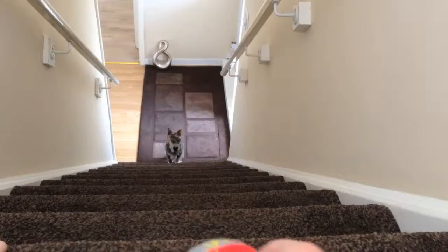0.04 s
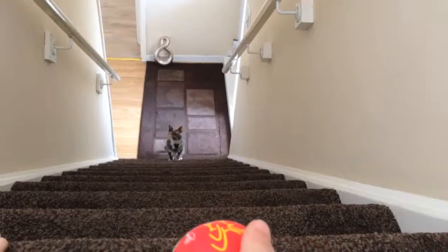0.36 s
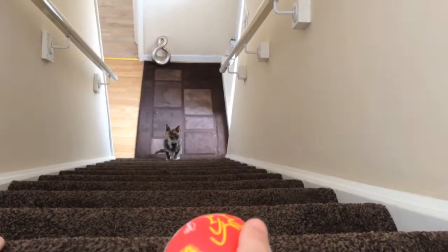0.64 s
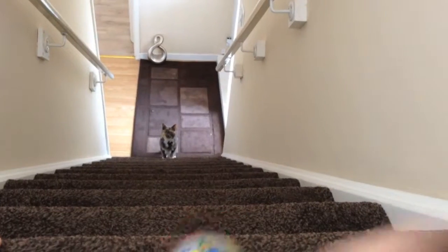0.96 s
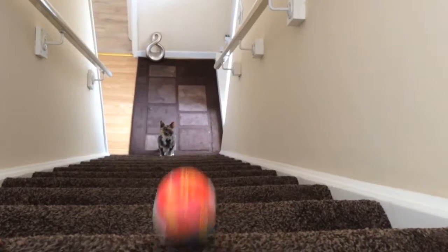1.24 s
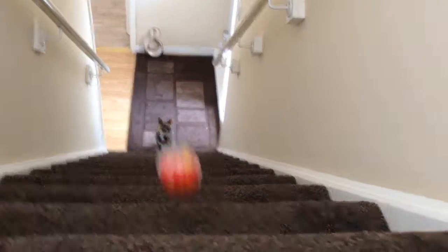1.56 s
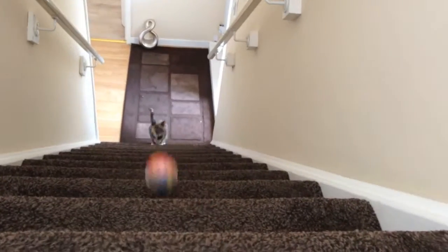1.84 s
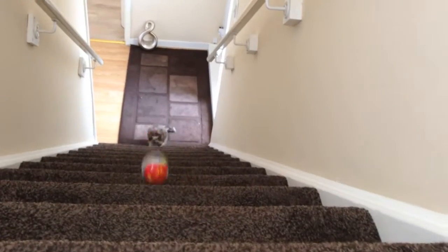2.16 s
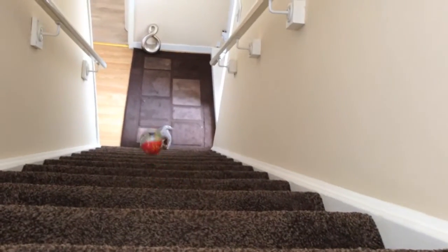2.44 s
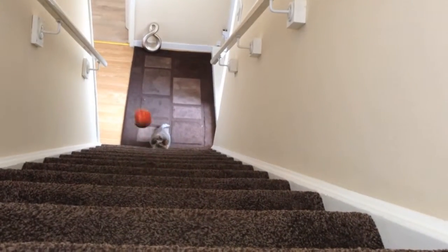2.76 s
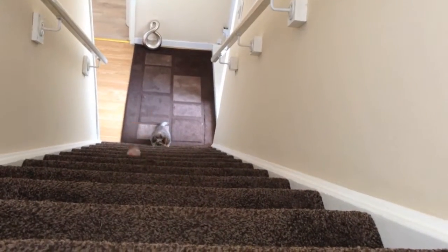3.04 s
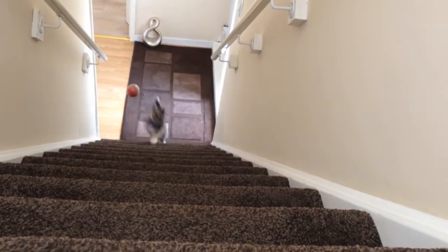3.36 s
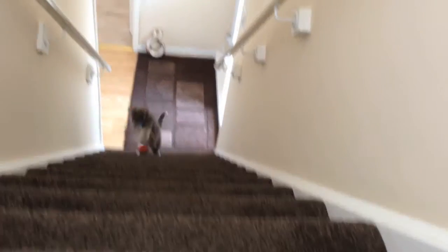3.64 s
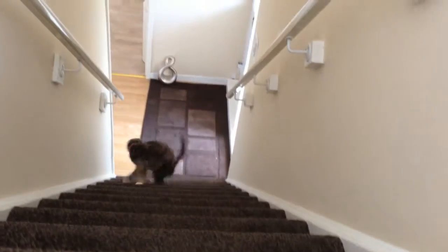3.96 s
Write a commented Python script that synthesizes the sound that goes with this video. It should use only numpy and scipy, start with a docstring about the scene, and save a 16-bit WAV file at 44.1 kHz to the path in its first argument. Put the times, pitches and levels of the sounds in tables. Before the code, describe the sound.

A ball bounces down carpeted wooden stairs, starting after a second of quiet indoor hiss. Six dull, low thuds come between about 1.1 and 3.1 seconds, each with a short boom in the stairwell. At about 3.6 seconds the ball smacks onto a hard floor. From around 3.3 seconds to 4, a small dog's paws thump softly and scuff, and its metal collar tag jingles faintly.

```python
"""A soft ball bounces down a carpeted wooden staircase and lands with a smack on the hard floor below.
Each bounce is a low push of the tread, a dull slap and the boom of the stairwell.
A small dog starts after it: its metal collar tag jingles, its paws thump and scuff.
A quiet hiss lies under all."""
import sys
import numpy as np
from scipy import signal
from scipy.fft import rfft, irfft
from scipy.io import wavfile
from scipy.ndimage import uniform_filter1d

SR = 44100
rng = np.random.default_rng(int(sys.argv[2]) if len(sys.argv) > 2 else 0)


def int16_out(signal):
    """Quantize to a 16-bit WAV file."""
    q = np.round(np.clip(np.atleast_2d(signal).T, -1, 1) * 32767)
    wavfile.write(sys.argv[1], SR, q.astype(np.int16))


N = 176400
T = np.arange(SR) / SR
ROOM_RISE_S, SWING_PHASE_CYCLES = 0.013, -0.42


def amp(db):
    """Decibels to gain."""
    return 10 ** (np.asarray(db) / 20)


def add(mix, start_s, sound):
    """Mixes a sound in at start_s."""
    part = mix[round(start_s * SR):][:len(sound)]
    part += sound[:len(part)]


def fade(rise_s, t60_s):
    """Linear attack, exponential decay."""
    return np.minimum(T / rise_s, 1) * np.exp(-np.log(1000) * np.maximum(T - rise_s, 0) / t60_s)


def noise(spectrum, peaks=(), size=SR):
    """Unit-rms noise with the given spectrum and resonances."""
    knots_hz, knots_db = np.transpose(spectrum)
    hz = np.fft.rfftfreq(size, 1 / SR)
    shape_db = np.interp(np.log(hz + 1), np.log(knots_hz), knots_db)
    shape_db += sum(db / (1 + (2 * (hz - centre) / width) ** 2) for centre, width, db in peaks)
    shaped = irfft(rfft(rng.standard_normal(size)) * amp(shape_db), size)
    return shaped / shaped.std()


def dense_noise(spectrum, peaks=()):
    """Noise with a fairly even envelope, as from many overlapping reflections."""
    analytic = signal.hilbert(noise(spectrum, peaks))
    even = analytic.real / np.sqrt(uniform_filter1d(abs(analytic) ** 2, size=600))
    return even / even.std()


def contact(spectrum, peaks=(), *, rise_s, t60_s, wet_db, room_t60_s):
    """A short noisy contact and its reverberation in the stairwell."""
    direct = dense_noise(spectrum, peaks) * fade(rise_s, t60_s)
    reverb = dense_noise(spectrum, peaks) * fade(ROOM_RISE_S, room_t60_s)
    return direct + amp(wet_db) * reverb


def push(hz, rise_s=0.0075):
    """A surface gives way and swings back: about two cycles."""
    swell = (T / rise_s * np.exp(1 - T / rise_s)) ** 2.28
    return swell * np.sin(2 * np.pi * (hz * T + SWING_PHASE_CYCLES))


# Each row: frequency in Hz, spectral density in dB.
HISS_SPECTRUM = [(25, -22), (45, -8), (80, -1), (150, -5), (250, -5.5), (400, -2), (700, -6.5), (1200, -11),
                 (2700, -11.5), (3700, -10.5), (6000, -12), (15000, -14.5)]

def hiss():
    """Steady hiss of the quiet house."""
    return amp(-67) * noise(HISS_SPECTRUM, size=N)


# Each row: frequency in Hz, spectral density in dB.
BOOM_SPECTRUM = [(25, -36), (50, -16), (88, 0), (160, 0), (230, -6), (400, -19.5), (650, -33), (1500, -44),
                 (5000, -56)]

def boom(envelope):
    """Low reverberation of the stairwell."""
    return dense_noise(BOOM_SPECTRUM) * envelope


# Each row: frequency in Hz, level in dB, T60 in seconds.
TAG_MODES = [(3100, -14.5, 0.17), (4350, -6, .16), (5460, -10, 0.21), (8514, -4.5, .2), (10830, -14, 0.09),
             (12020, -4, .15), (12090, -3.5, 0.1), (13550, -22, .08)]
# Each row: start in seconds, level in dB, ring time factor, tilt in dB per octave.
JINGLES = [(2.491, -70, 1, 2), (3.501, -53, 0.63, 2), (3.55, -54, 0.43, 2), (3.568, -50, 1, 3),
           (3.583, -54.5, 1.2, 1), (3.613, -56, 0.88, -2), (3.7353, -58, .35, -6), (3.823, -61.5, 0.87, -4)]

def collar_tag():
    """A small metal tag ticks and rings, damped and coloured differently at each touch."""
    out = np.zeros(N)
    rise_s, pivot_hz = 0.00082, 8000
    for start_s, level_db, ring_factor, tilt_db in JINGLES:
        ring = np.zeros(SR)
        for hz, db, t60_s in TAG_MODES:
            mode_db = db + tilt_db * np.log2(hz / pivot_hz) + rng.standard_normal()
            detuned_hz = hz * (1 + 0.0012 * rng.standard_normal())
            tone = np.sin(2 * np.pi * (detuned_hz * T + rng.random()))
            ring += amp(mode_db) * fade(rise_s, t60_s * ring_factor) * tone
        tick = amp(-8) * rng.standard_normal(SR) * fade(rise_s, t60_s=0.028)
        add(out, start_s, amp(level_db) * (ring + tick))
    return out


# Each row: frequency in Hz, spectral density in dB.
SCUFF_SPECTRUM = [(100, -6), (340, 3), (550, -0.5), (1250, -1), (2200, -5), (3200, -6.5), (4500, -12.5),
                  (7000, -23), (15000, -32)]
# Each row: centre in Hz, width in Hz, gain in dB.
SCUFF_PEAKS = [(342, 130, 9.5), (920, 150, 5), (1860, 150, 9), (2890, 220, 12), (3950, 200, 6)]
# Each row: start in seconds, level in dB.
SCUFFS = [(3.848, -60.5), (3.872, -45.5)]

def paw_scuffs():
    """Paws scrape the floor."""
    out = np.zeros(N)
    for start_s, db in SCUFFS:
        scuff = contact(SCUFF_SPECTRUM, SCUFF_PEAKS,
                        rise_s=0.012, t60_s=0.066, wet_db=-11, room_t60_s=0.27)
        add(out, start_s, amp(db) * scuff)
    return out


# Each row: frequency in Hz, spectral density in dB.
SLAP_SPECTRUM = [(30, -38), (70, -14), (140, -5), (250, -3), (410, 0), (540, -11), (700, -17), (1000, -25),
                 (1400, -29.5), (2100, -30.5), (4000, -41.5), (9000, -63)]

def slap():
    """Dull noise of a soft blow."""
    return contact(SLAP_SPECTRUM, rise_s=0.003, t60_s=0.081, wet_db=-13.5, room_t60_s=0.25)


def carpet_brush():
    """The pile is brushed just before the blow."""
    return dense_noise(SLAP_SPECTRUM) * fade(rise_s=0.0084, t60_s=0.04)


# Each row: start in seconds, level in dB, pitch in Hz, slap level in dB.
THUMPS = [(1.281, -47, 112, -67), (3.305, -57, 130, -69), (3.455, -56, 140, -69), (3.711, -36.5, 117, -54),
          (3.765, -44, 116, -63), (3.803, -49.5, 148, -68), (3.939, -39, 116, -66)]

def thumps():
    """Soft knocks of treads and paws, each with a faint boom and slap."""
    out = np.zeros(N)
    for start_s, db, hz, slap_db in THUMPS:
        knock = push(hz) + amp(-15.5) * boom(fade(ROOM_RISE_S, t60_s=0.33))
        add(out, start_s, amp(db) * knock + amp(slap_db) * slap())
    return out


# Each row: frequency in Hz, level in dB, T60 in seconds.
STAIR_MODES = [(91.5, -1, 0.31), (111.8, 2, 0.35), (156.2, -2, 0.28), (204, -11.5, 0.3), (312, -19, 0.25),
               (397.4, -18.5, 0.226)]

def stair_ring():
    """The wooden staircase rings in its low modes."""
    return sum(amp(db) * fade(ROOM_RISE_S, t60_s) * np.sin(2 * np.pi * (hz * T + SWING_PHASE_CYCLES))
               for hz, db, t60_s in STAIR_MODES)


# Each row: frequency in Hz, spectral density in dB.
CLACK_SPECTRUM = [(60, -20), (250, -5), (550, -4.5), (1000, -7.5), (1700, -2.5), (2800, -5.5), (4000, -3.5),
                  (5100, -6.5), (6500, -11.5), (10000, -20), (15000, -26)]
# Each row: centre in Hz, width in Hz, gain in dB.
FLOOR_PEAKS = [(800, 120, 7), (1260, 160, 7), (1720, 140, 5.5), (2320, 200, 6), (3920, 220, 6.5),
               (5000, 270, 3)]
# Each row: start in seconds, level in dB, extra resonance in Hz, its gain in dB.
CLACKS = [(3.5645, -40, 4350, 10.5), (3.5694, -38.5, 2050, 6)]

def ball_landing():
    """A double clack and boom on the hard floor, then the low push and ring of the boards."""
    out = np.zeros(N)
    rise_s, peak_width_hz, push_start_s = 0.0016, 570, 3.5735
    for start_s, db, peak_hz, peak_db in CLACKS:
        peaks = FLOOR_PEAKS + [(peak_hz, peak_width_hz, peak_db)]
        clack = contact(CLACK_SPECTRUM, peaks, rise_s=rise_s, t60_s=0.033, wet_db=-13.5, room_t60_s=0.23)
        add(out, start_s, amp(db) * clack)
    add(out, CLACKS[0][0], amp(-42.5) * boom(fade(rise_s, t60_s=0.37)))
    add(out, push_start_s, amp(-28.5) * push(hz=141) + amp(-46) * stair_ring())
    return out


# Each row: start in seconds, push level in dB, push pitch in Hz, pock, slap and boom levels in dB,
# boom T60 in seconds, stair ring level in dB, echo lag in seconds, echo level in dB.
BOUNCES = [(1.0760, -26.5, 127, -45.5, -47.5, -44, 0.24, -46.5, .042, -43),
           (1.5354, -30.5, 132.4, -33.5, -41, -43.5, 0.19, -51, 0.0551, -40.5),
           (1.8900, -25, 138.5, -34.5, -39.5, -41.5, 0.27, -40.5, .038, -42),
           (2.2700, -28.5, 128.6, -39, -44, -42.5, 0.28, -36, .042, -43),
           (2.6440, -38, 135.4, -43.5, -50, -45, 0.3, -46.5, 0.0552, -44),
           (3.1350, -29.5, 147, -36, -36.5, -38, .26, -40, .013, -30.5)]

def ball_bounces():
    """Six dull bounces on carpeted treads; the stairwell echoes each push once, booms and murmurs on."""
    out = np.zeros(N)
    ring = stair_ring()
    pock = push(hz=288.7, rise_s=0.0035)  # the ball's skin flattens and springs back
    murmur_envelope = amp(-66.5) * fade(ROOM_RISE_S, t60_s=1.3)
    for start_s, push_db, hz, pock_db, slap_db, boom_db, t60_s, ring_db, lag_s, echo_db in BOUNCES:
        add(out, start_s - 0.008, amp(slap_db - 15) * carpet_brush())
        add(out, start_s, amp(push_db) * push(hz) + amp(ring_db) * ring)
        add(out, start_s + 0.00199, amp(slap_db) * slap())
        add(out, start_s + 0.0025, amp(pock_db) * pock)
        add(out, start_s + 0.004, boom(amp(boom_db) * fade(ROOM_RISE_S, t60_s) + murmur_envelope))
        add(out, start_s + lag_s, amp(echo_db) * push(hz))
    return out


def scene():
    """Ball, dog and hiss in mono; the knocks carry little deep bass."""
    low_cut_hz = 41
    highpass = signal.butter(2, low_cut_hz, "high", fs=SR, output="sos")
    knocks = ball_bounces() + ball_landing() + thumps() + paw_scuffs()
    return (signal.sosfilt(highpass, knocks) + collar_tag() + hiss())[None]


def record(dry):
    """Fade-in, then a steep low-pass."""
    silence_s, fade_in_s, cutoff_hz = 0.085, 0.078, 15400
    fade_in = np.clip((np.arange(N) / SR - silence_s) / fade_in_s, 0, 1)
    lowpass = signal.firwin(511, cutoff_hz, window=("kaiser", 9), fs=SR)
    return signal.oaconvolve(dry * fade_in, lowpass[None], "same")


dry = scene()
out = record(dry)
int16_out(out)
```